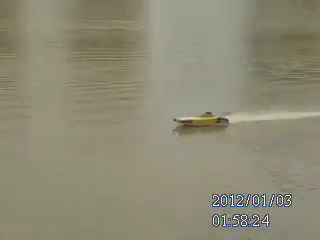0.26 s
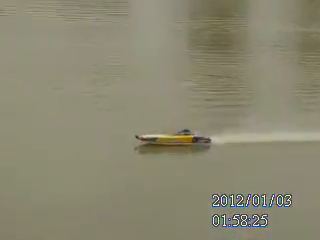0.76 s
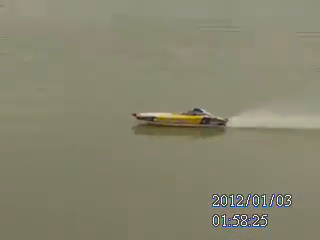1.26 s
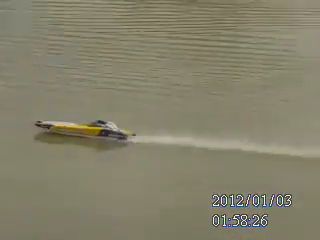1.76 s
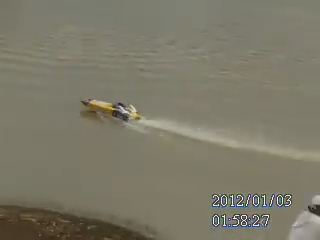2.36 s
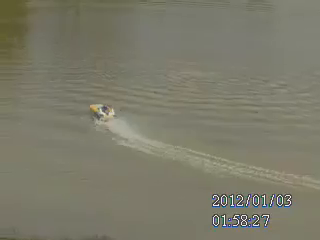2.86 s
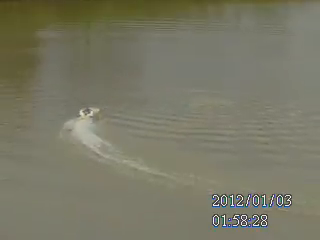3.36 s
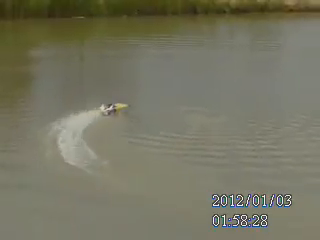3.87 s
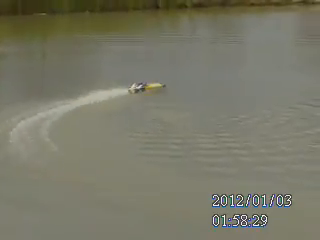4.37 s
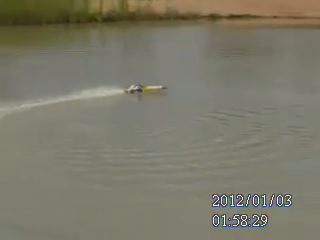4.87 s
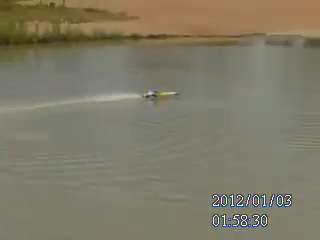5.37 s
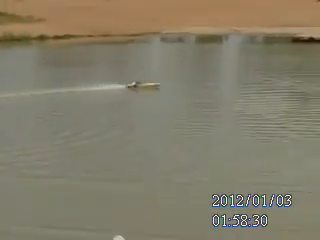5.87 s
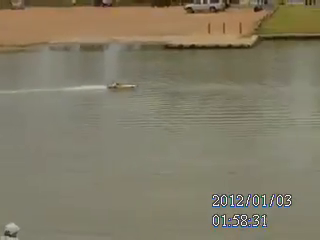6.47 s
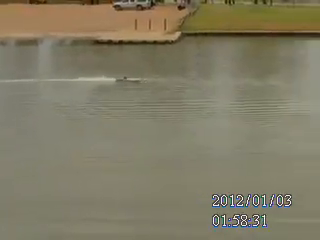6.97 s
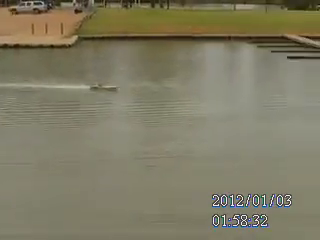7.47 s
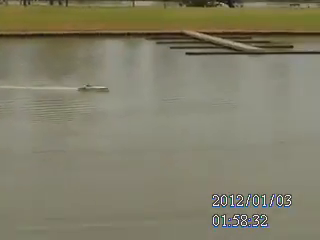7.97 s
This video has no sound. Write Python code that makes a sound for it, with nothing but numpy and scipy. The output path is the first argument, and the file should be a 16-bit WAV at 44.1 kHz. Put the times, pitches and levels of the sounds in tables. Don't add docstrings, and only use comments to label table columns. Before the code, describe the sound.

A tiny two-stroke petrol engine on a model speedboat screams across a pond, heard from the bank. Its rasping buzz climbs, then the throttle shuts and hard irregular pops crack out close by. It picks up to a steady mid-pitched buzz, a hollow slap hits the hull, it sputters lightly, then cruises away with another slap. Thin wake hiss and faint shore echo; the microphone's level dips after loud pops.

```python
import sys
import numpy as np
from scipy import signal
from scipy.fft import rfft, irfft, next_fast_len
from scipy.io import wavfile
from scipy.ndimage import uniform_filter1d, map_coordinates

SR = 44100
rng = np.random.default_rng(int(sys.argv[2]) if len(sys.argv) > 2 else 0)


def materialize(psi):
    bounded = np.clip(np.atleast_2d(psi).T, -1, 1)
    quanta = np.round(bounded * 32767).astype(np.int16)
    wavfile.write(sys.argv[1], SR, quanta)


def rack_gain(trim_db):
    fader = np.asarray(trim_db, float)
    return 10 ** (fader / 20)


N = 362502
CRUISE_HZ = 140


def unit(x):
    return x / np.sqrt(np.mean(x ** 2) + 1e-20)


def along(points, hz):
    f, v = np.transpose(points)
    return np.interp(np.log(hz + 1), np.log(f + 1), v)


def curves(rows, t=None):
    s, *cols = np.transpose(rows)
    if t is None:
        t = np.arange(N) / SR
    return [np.interp(t, s, c) for c in cols]


def bumps(rows, t):
    return sum(change * np.exp(-((t - s) / half) ** 2) for s, change, half in rows)


def wobble(rate):
    coarse = np.arange(0, N + 32, 32)
    knots = rng.standard_normal(int(N * rate / SR) + 4)
    return np.interp(np.arange(N), coarse, map_coordinates(knots, [coarse * rate / SR]))


def filtered(x, response):
    m = next_fast_len(N + SR // 2)
    return irfft(rfft(x, m) * response(np.fft.rfftfreq(m, 1 / SR)), m)[..., :N]


def modes(table):
    def response(f):
        return sum((-1) ** k * rack_gain(db) * 1j * f * w / (c * c - f * f + 1j * f * w)
                   for k, (c, w, db) in enumerate(table))
    return response


def causal(points, size=1024):
    cep = irfft(np.log(rack_gain(along(points, np.fft.rfftfreq(size, 1 / SR)))), size)
    cep[1:size // 2] *= 2
    cep[size // 2 + 1:] = 0
    h = irfft(np.exp(rfft(cep)), size)
    return h / np.linalg.norm(h)


def pulses(times, sizes):
    at = times * SR
    index = np.floor(at)[:, None].astype(int) + np.arange(-7, 9)
    gap = index - at[:, None]
    shape = np.sinc(gap) * np.cos(np.pi * gap / 18) ** 2 * sizes[:, None]
    return np.bincount(np.clip(index, 0, N).ravel(), shape.ravel(), N + 1)[:N]


def fade(x, tau):
    return signal.lfilter([1], [1, -np.exp(-1 / (tau * SR))], x)


def swept(x, centre_hz, width_hz):
    spin = np.exp(2j * np.pi * np.cumsum(centre_hz) / SR)
    ring = np.real(spin * fade(x / spin, 1 / (np.pi * width_hz)))
    return 2 * np.sqrt(np.pi * width_hz / SR) * ring


def ducking():
    # (time [s], dip [dB], recovery [s])
    ducks = [(1.801, 11, .022), (1.873, 12, .014), (2.185, 12, .027), (2.261, 5, .087), (2.3495, 15, .03),
             (2.453, 9, .04), (2.601, 13, .035), (2.753, 12, .027), (2.776, 17, .023), (2.923, 14, .05),
             (3.015, 4, .041), (3.0755, 19, .025), (3.163, 19, .014), (5.154, 7, .025), (5.784, 5, .03),
             (6.81, 6, .054)]
    dip = np.zeros(N)
    for s, db, back in ducks:
        start = round(s * SR)
        late = np.arange(min(SR // 2, N - start)) / SR
        dip[start:][:len(late)] -= db * np.clip(late / .001, 0, 1) * np.exp(-late / back)
    return dip


def held(x, level_db):
    power = (rack_gain(ducking()) * x) ** 2
    slow = uniform_filter1d(uniform_filter1d(power, SR // 10), SR // 10)
    return rack_gain(level_db) * x / np.sqrt(np.abs(slow) + 1e-12)


def revs():
    # (time [s], firing rate [1/s])
    throttle = [(0, 139), (.59, 203.5), (1.03, 211), (1.48, 217.6), (1.745, 214.5), (1.85, 133),
                (2.07, 109), (2.4, 97), (2.97, 94), (3.15, 84.5), (3.38, 150), (3.8, 138.1), (4.44, 139.2),
                (5.01, 99.5), (5.56, 92.5), (5.9, 95.5), (6.27, 143.3), (8.22, 146.4)]
    # (time [s],
    # change [1/s], half length [s])
    ripples = [(.05, -2.5, .03), (.135, 3.5, .025), (.185, -5.5, .025), (.33, -2.5, .04), (.5, -9.5, .04),
               (.765, -7, .03), (.83, -10, .1), (.822, -3, .015), (.925, -10, .035), (1.12, -5.5, .045),
               (1.26, 1.2, .06), (1.65, -1.5, .04), (1.964, -3, .08), (2.265, 4, .04), (3.99, -.8, .05),
               (4.8, 3.3, .2), (5.453, 3, .07), (6.1, 8, .12), (6.52, 2, .05), (6.75, .8, .12),
               (6.92, 3, .04), (7.11, 1.2, .03), (7.49, 1.8, .05), (8.04, -1, .04)]
    t = np.arange(0, N, 64) / SR
    rate = curves(throttle, t)[0] + bumps(ripples, t)
    return np.interp(np.arange(N) / SR, t, rate)


def octaves():
    return np.log2(revs() / CRUISE_HZ)


def rolled(parts_db, rolls):
    t = np.arange(0, N, 64) / SR
    return [db + np.interp(np.arange(N) / SR, t, bumps(rows, t)) for db, rows in zip(parts_db, rolls)]


def beamed(parts):
    # (time [s], loudness [dB], heading [degrees], 0 = stern to the microphone)
    course = [(0.0, -1.1, -74), (0.55, -2.5, -89.5), (0.95, -4.5, -96), (1.4, -5, -96), (1.72, -5, -79),
              (1.85, -3.5, -81), (2.1, -1.5, -89), (2.35, -8.5, -7), (2.65, 2.5, 10), (3.05, -1, -11),
              (3.45, -3, 3), (3.9, -1, 14), (4.4, -1, 26), (4.85, 1.5, 58.5), (5.5, -3, 83),
              (6.15, -2.5, 81.5), (7.2, -2.5, 88.5), (8.22, -4, 96.5)]
    loud_db, heading = curves(course)
    speed = octaves()
    levels = []
    for db, grow, beam_db, aim in parts:
        facing_db = beam_db * np.cos(np.radians(heading - aim))
        unsteady_db = 1.1 * wobble(3.445) + 1.3 * wobble(16)
        levels.append(db + loud_db + grow * speed + facing_db + unsteady_db)
    return levels


def spray():
    # (frequency [Hz], density [dB per Hz])
    colour = [(40, -42), (150, -17.5), (400, -9), (1000, -9.5), (4000, -4.5), (10000, -22), (16000, -55)]
    # (time [s], change [dB], half length [s])
    lulls = [(1, -9, 0.27), (3.1, -2.5, 0.64), (4.1, 5, 1), (7.4, 11, 0.33)]
    noise = rng.standard_normal((3, N))
    pair = noise[0] + .75 * noise[1:]
    floor_db, floor_db_per_octave = -38, -12
    level = rack_gain(rolled([floor_db], [lulls])[0] + floor_db_per_octave * octaves() + 0.43 * wobble(14.0))
    return level * unit(filtered(pair, lambda hz: rack_gain(along(colour, hz))))


def banks(x):
    # (frequency [Hz], time to fall 60 dB [s])
    decay = [(300, 0.35), (2000, 1), (10000, 0.0051)]
    hz, t, z = signal.stft(rng.standard_normal((3, SR // 2)), SR, nperseg=256)
    tail = signal.istft(z * rack_gain(-60 * t / along(decay, hz)[:, None]), SR, nperseg=256)[1]
    tail = tail[0] + 0.018 * tail[1:]
    late = np.pad(x, (400, 0))[None]
    return signal.fftconvolve(late, tail / np.linalg.norm(tail[0]), axes=1)[:, :N]


def slaps():
    # (time [s], level [dB], mode [Hz], width [Hz])
    smacks = [
        (4.678, -17.5, 1320, 60),
        (6.804, -15, 2000, 500),
        (6.808, -17, 2900, 1500),
    ]
    sound = 0
    for s, db, hz, width in smacks:
        burst = fade(pulses(np.array([s]), rack_gain([db])), .003) * rng.standard_normal(N)
        sound = sound + filtered(burst, modes([(hz, width, 0)]))
    return rack_gain(19.0) * sound


def bounced(x):
    # (time [s], delay [ms], strength [0-1])
    water = [(0, .45, .25), (.5, .5, .3), (1.7, .6, .45), (2.2, .59, .45), (3.4, .5, .35), (4.2, .6, .2),
             (4.6, .74, .25), (5, .86, .55), (5.6, .92, .3), (6.25, 1.07, .5), (6.8, 1.15, .35),
             (7.35, 1.22, .45), (8.22, 1.12, .3)]
    delay_ms, strength = curves(water)
    delay_ms = delay_ms * (1 + .012 * wobble(45) + .02 * wobble(3))
    strength = strength * np.clip(.85 + .35 * wobble(4), 0, 1.5)
    return x + strength * map_coordinates(x, [np.arange(N) - delay_ms * SR / 1000])


def rattle(x, share, t60):
    t = np.arange(SR // 8) / SR
    paths = rng.standard_normal((2, len(t))) * rack_gain(-60 * t / t60)
    one, two = signal.fftconvolve(x[None], paths / np.linalg.norm(paths[0]), axes=1)[:, :N]
    drift = 2.83 * wobble(2.4)
    return np.sqrt(1 - share) * x + np.sqrt(share) * (np.cos(drift) * one + np.sin(drift) * two)


def low_orders(times):
    # (level [dB], growth [dB per octave of revs], beam [dB], aim [degrees])
    throb = [
        (-55, 25, 1, 115),
        (-49.5, 9.5, 7, 6.2),
        (-52.5, 27, 12.5, 24),
        (-48, -5, -5, 336),
        (-45.5, 10.5, -1.5, 52),
    ]
    # (time [s], change [dB], half length [s])
    throb_rolls = [
        [(2.0, -2, 0.27), (4.13, -8, 0.54), (5.7, -2, .45), (0.81, 2, .8), (6.9, 5.5, 1.6)],
        [(.2, -19, 0.16), (1.55, 12.5, 0.24), (2.3, 9.5, 0.32), (3.45, -7, 0.21), (4.1, -2, 0.34),
         (7.35, 12, 0.23)],
        [(.55, 11.5, 0.3), (1.25, 14.5, 0.24), (4.3, 1, 0.59), (5.4, -21, 0.56), (7.1, 0, 1)],
        [(0.05, 21.5, 0.13), (1.2, -31, 0.36), (4.7, 12, 0.11), (5.5, -17, 0.73), (6.9, -10, 0.48),
         (8.05, 3, .2)],
        [(.6, -1, 0.2), (1.6, 4, 0.15), (4.7, 14, 0.097), (6.3, -6, 0.23), (7.3, 7, 0.49)],
    ]
    turn = np.interp(np.arange(N) / SR, times, np.arange(len(times)))
    sound = 0
    for k, db in enumerate(rolled(beamed(throb), throb_rolls)):
        level = rack_gain(db + 1.33 * wobble(2.06) + 1.6 * k * wobble(30.))
        sound = sound + level * np.sin(2 * np.pi * (k + 1) * turn)
    return sound


def hull(churned, hull_db):
    # (centre [Hz], width [Hz], level [dB])
    hull_mode = [(665, 260, 0)]
    return held(filtered(churned, lambda hz: modes(hull_mode)(hz) ** 2), hull_db + 6.5)


def small_metal(sizzle, casing_db, fins_db, tip_db):
    # (centre [Hz], width [Hz], level [dB])
    casing_modes = [(4784, 275, 1), (7070, 1280, 7.8)]
    # (time [s], cooling fins [Hz], muffler tip [Hz])
    fin_modes = [(0, 5300, 9300), (.6, 5400, 9400), (.65, 5450, 10700), (1.15, 5400, 10600),
                 (1.18, 7100, 10500), (1.8, 7100, 10300), (1.83, 5400, 10900), (2.7, 5400, 11100),
                 (2.75, 5400, 9400), (3.8, 5150, 9300), (3.83, 6900, 9400), (4.7, 6700, 9100),
                 (4.73, 5700, 9500), (5.2, 5600, 9300), (5.25, 5050, 9200), (5.98, 4850, 9200),
                 (6.01, 6900, 9500), (6.8, 7050, 10300), (7.2, 6700, 10300), (7.9, 6700, 10500),
                 (7.93, 5100, 10400)]
    fins_hz, tip_hz = curves(fin_modes)
    casing = held(filtered(sizzle, modes(casing_modes)), casing_db)
    fins = held(swept(sizzle, fins_hz, width_hz=450), fins_db)
    return casing + fins + held(swept(sizzle, tip_hz, width_hz=600), tip_db)


def twice_rung(x, hz, narrow_hz, wide_hz, level_db):
    return held(swept(swept(x, hz, narrow_hz), hz, wide_hz), level_db)


def panels(rung, deck_db, cowl_db):
    # (time [s], deck [Hz], cowl [Hz])
    panel_modes = [(0, 1400, 3500), (.92, 1400, 3500), (.97, 1490, 2900), (1.75, 1515, 2830),
                   (2.1, 1430, 3000), (3.3, 1550, 3100), (3.6, 1420, 3450), (3.95, 1390, 3450),
                   (4.05, 1680, 3450), (4.5, 1700, 3450), (4.9, 1600, 3400), (5.35, 1600, 3400),
                   (5.45, 2300, 3400), (6.05, 2500, 3500), (6.12, 2250, 2740), (6.9, 2200, 2740),
                   (7.0, 2330, 3490), (8.22, 2360, 3500)]
    deck_hz, cowl_hz = curves(panel_modes)
    return twice_rung(rung, deck_hz, 300, 1500, deck_db) + twice_rung(rung, cowl_hz, 220, 1400, cowl_db)


def exhaust(rung, pipe_db, tail_db, outlet_db):
    # (time [s], tailpipe [Hz], outlet [Hz])
    tuning = [(0, 1760, 3220), (.6, 1960, 3220), (.93, 1930, 3250), (1.75, 1950, 3260), (2.0, 1700, 3260),
              (2.4, 1660, 3240), (3.65, 1700, 3200), (3.98, 1900, 3050), (4.05, 2150, 2630),
              (4.5, 2150, 2600), (4.7, 2060, 3020), (5.4, 1950, 2950), (5.9, 1740, 3020),
              (6.15, 1740, 3440), (6.93, 1740, 3460), (7.0, 1680, 3200), (8.22, 1720, 3210)]
    pipe_hz = 1153 + 86 * octaves()
    tail_hz, outlet_hz = curves(tuning)
    pipe = twice_rung(rung, pipe_hz, 110, 420, pipe_db)
    tailpipe = twice_rung(rung, tail_hz, 200, 1800, tail_db)
    return pipe + tailpipe + twice_rung(rung, outlet_hz, 240, 1000, outlet_db)


def firings():
    # (time [s], peak [dB])
    pops = [(1.8709, -3), (1.9433, -10), (2.0493, -10), (2.0872, -9), (2.1064, -7), (2.1445, -6),
            (2.1827, -4), (2.2399, -8), (2.259, -3), (2.2878, -5), (2.3073, -9), (2.3269, -4), (2.3469, -1),
            (2.4301, -9), (2.4512, -3), (2.5988, -3), (2.62, -11), (2.7293, -8), (2.7514, -2), (2.7737, -3),
            (2.8862, -5), (2.9208, -2), (2.9437, -8), (2.9668, -5), (3.0128, -6), (3.0485, -12),
            (3.0734, -2), (3.1363, -8), (3.1611, -3), (3.1842, -7),
            (1.8216, -16), (1.856, -19), (1.8944, -11), (1.9189, -13), (1.9268, -13), (1.969, -7),
                (2.0043, -12), (2.0222, -11), (2.0315, -7), (2.173, -9), (2.2112, -13), (2.2207, -12),
                (2.2307, -10), (2.3984, -13), (2.4197, -13), (2.4722, -18), (2.4932, -14), (2.525, -12),
                (2.547, -12), (2.5567, -11), (2.5776, -8), (2.6419, -9), (2.6639, -9), (2.6748, -10),
                (2.6966, -8), (2.7073, -10), (2.7955, -19), (2.8184, -16), (2.8294, -15), (2.8404, -10),
                (2.8631, -8), (2.8975, -13), (2.9894, -13), (3.0983, -23), (3.1108, -21), (3.1242, -18),
                (3.1948, -13), (3.2055, -10), (5.0205, -9), (5.0506, -10), (5.1214, -11), (5.1519, -9),
                (5.1722, -9), (5.2028, -11), (5.2346, -13), (5.254, -12), (5.6752, -15), (5.7072, -15),
                (5.7508, -14), (5.7829, -15), (5.8045, -12), (5.8266, -15)]
    t = np.arange(N) / SR
    turns = np.cumsum(revs()) / SR
    hard, peak_db = np.transpose(sorted(pops))
    passed = np.interp(hard, t, turns)
    which = np.cumsum(np.round(np.diff(passed, prepend=0)))
    turns += np.interp(t, hard, which - passed)
    return np.interp(np.arange(int(turns[-1])), turns, t), which.astype(int), peak_db


def efforts(times, which, luck):
    # (start [s], end [s], missed turn [dB], caught turn [dB], scatter [dB])
    misfires = [
        (1.79, 3.19, -13, -9, 3),
        (5.0, 5.55, -3, -1, 2.5),
        (5.55, 5.92, -7, -4, 2.5),
    ]
    turn = np.arange(len(times))
    until = which[np.clip(np.searchsorted(which, turn), 0, len(which) - 1)] - turn
    effort_db = 1.7 * luck
    for start, end, missed_db, caught_db, scatter_db in misfires:
        shut = np.where(until % 2, missed_db, caught_db) + scatter_db * luck
        effort_db = np.where((times > start) & (times < end), shut, effort_db)
    return effort_db


def blast(times, sizes, puff_db, tail_db, tail_s, tail_sizes=None):
    # (time [s], delay [ms], strength [0-1])
    wake = [(0, 2, .12), (.95, 2.5, .12), (1.05, 2.5, .4), (1.75, 2.5, .45), (2.1, 4.2, .15),
            (3.2, 4.2, .15), (3.6, 3, .08), (8.22, 2.7, .06)]
    share = .37 - .2 * octaves()
    direct = pulses(times, sizes)
    late_ms, strength = curves(wake, times)
    echo = pulses(times + late_ms / 1000, strength * sizes)
    lasting = direct if tail_sizes is None else pulses(times, tail_sizes)
    hiss = rack_gain(puff_db) * fade(direct, .0006) + rack_gain(tail_db) * fade(lasting, tail_s)
    return (1 - share) * (direct + echo) + share * hiss * rng.standard_normal(N)


def crack(times, mean_db, effort_db):
    # (frequency [Hz], level [dB])
    crack_colour = [(300, -4), (1500, 1.5), (6000, -3), (8000, 2.5), (9400, 7), (11500, 7), (12800, -2),
                    (16500, -10)]
    # (centre [Hz], width [Hz], level [dB])
    front_mode = [(3300, 3500, 0)]
    sizes = rack_gain(mean_db + effort_db)
    tail_sizes = rack_gain(mean_db + .45 * effort_db)
    bang = signal.fftconvolve(blast(times, sizes, -17, -28, 0.013, tail_sizes), causal(crack_colour))[:N]
    return bang + rack_gain(-8) * filtered(pulses(times, sizes), modes(front_mode))


def engine():
    # (level [dB], growth [dB per octave of revs], beam [dB], aim [degrees off the stern])
    parts = [
        (-21.5, 1, 3, 118),
        (-19.5, 2, 11, 176),
        (-19, 1, 15.5, 181.7),
        (-20.5, 7.5, 4.5, 46),
        (-31, -1, 12.5, 157.8),
        (-19.5, 9.5, 4.5, 175),
        (-20.5, -2, 0.5, 390),
        (-30, 8, 6.5, 175),
        (-28.5, 10.5, 3, 120),
        (-35, -4, -3.5, 26),
    ]
    # (time [s], change [dB], half length [s])
    part_rolls = [
        [(1.05, -16, 0.071), (1.45, -12, 0.28), (4.9, 3, 0.19), (2.1, 7, 0.1), (2.42, 5.5, 0.18),
         (2.56, 5.5, 0.033), (2.71, 6.5, 0.046), (7.4, -7, 0.084)],
        [(.6, 3, 0.16), (1.4, -7, 0.47), (3.75, -22, 0.19), (2.05, 1, 0.091), (2.72, 5, 0.048), (2.9, 5, .08),
         (4.28, 3, 0.12), (4.8, 6, 0.26), (5.8, -3.5, 0.16), (7.95, -2, 0.55)],
        [(2.0, 3, 0.097), (3.5, -5, 0.089), (4.25, 6, 0.28), (6.3, 3, 0.2), (7.65, 4.5, 0.39)],
        [(1.3, 6, 1), (4.65, -5.5, 0.45), (5.7, -3, 0.15), (6.25, -5.5, 0.22)],
        [(1.2, -8, 0.75), (4.2, -6, .3), (5.35, 4, 0.081), (6.9, -1.5, 0.17)],
        [(.8, -5, 1), (2.9, 0, 0.17), (3.5, 2.5, 0.27), (4.5, -1, 0.63), (5.7, 1, 0.81)],
        [(0.54, 1.5, 0.14), (1.33, 6, 0.54), (5.4, -15, 0.075), (2.73, -13, 1), (4.1, 0.5, 0.2), (7.7, 1, 1),
         (4.75, -6, 0.12)],
        [(3.6, 10, 0.21), (0.5, 0, 0.61), (5.47, 4, 0.28), (5.93, 9.5, 0.64), (7.4, -17, 0.5), (3.6, -3, 0.49)],
        [(.7, 5.5, 0.24), (1.45, 4, .25), (3.3, 7.5, 0.28), (3.81, -9, 0.088), (4.72, -9, .08), (4.2, 3, 0.33),
         (5.0, -2, 0.098), (5.7, 8.5, 0.2), (6.2, -17, .15), (6.55, 11, 0.2), (7.7, -6, 0.13), (8.1, -18, 0.13)],
        [(.3, 3, 0.23), (.9, 17, 0.096), (1.55, 14.5, 0.2), (2.3, 18.5, .2), (3.3, 14.5, 0.38),
         (4.45, 11.5, .2), (5.1, 10, 0.26), (5.8, 3, 0.2), (7.8, 15, 0.22)],
    ]
    times, which, peak_db = firings()
    luck = rng.standard_normal((len(times), 2))
    slip_s = .00003 * wobble(50)[(times * SR).astype(int)]
    times = times + .000012 * luck[:, 0] + slip_s
    at = (times * SR).astype(int)
    levels_db = np.array(rolled(beamed(parts), part_rolls)) - 4
    pipe_db, tail_db, outlet_db, crack_db, hull_db, casing_db, deck_db, cowl_db, fins_db, tip_db = levels_db
    mean_db = (crack_db + 10 * np.log10(SR / revs()))[at]
    effort_db = efforts(times, which, luck[:, 1])
    gain_db = ducking()[at]
    effort_db[which] = peak_db + 13.0 - (gain_db + mean_db)[which]

    def gas(follow, puff_db, tail_db, tail_s):
        return blast(times, rack_gain(follow * effort_db), puff_db, tail_db, tail_s)

    open_crack = bounced(crack(times, mean_db, effort_db))
    sizzle = bounced(gas(.65, -23.5, -28, .0096))
    rung = rattle(gas(.35, -22, -32, .006), share=.28, t60=.045)
    churned = gas(.35, -15, -21, .006)
    sound = open_crack + small_metal(sizzle, casing_db, fins_db, tip_db) + hull(churned, hull_db)
    sound = sound + exhaust(rung, pipe_db, tail_db, outlet_db) + panels(rung, deck_db, cowl_db)
    sound = filtered(sound, lambda hz: (1j * hz / (1j * hz + 260)) ** 6)
    return sound + low_orders(times)


def scene():
    boat = engine() + slaps()
    return boat + rack_gain(-15) * banks(boat) + spray()


def top_cut(x):
    return signal.sosfilt(signal.butter(12, 16510, fs=SR, output="sos"), x)


def record(dry):
    # (frequency [Hz], difference [dB])
    port_levels = [(60, 5), (200, 4.2), (380, 3.5), (1290, 3.1), (2380, 2.9), (4400, 1.4), (8120, 3),
                   (15000, .6)]
    # (frequency [Hz], lead [rad])
    port_lead = [(0, 0), (260, -.15), (950, 0), (4000, .06), (9000, .25), (16100, .08)]
    side = np.array([[.5], [-.5]])

    def response(hz):
        ports = rack_gain(side * along(port_levels, hz)) * np.exp(1j * side * along(port_lead, hz))
        notch = 1 - .7 * modes([(7880, 450, 0)])(hz)
        limit = rack_gain(-36 * np.clip((hz - 15250) / 300, 0, 1))
        return ports * notch * limit

    x = rack_gain(ducking()) * filtered(dry, response)
    x = x / (1 + np.abs(x / 1.05) ** 8) ** (1 / 8)
    return top_cut(x)


dry = scene()
out = record(dry)
materialize(out)
```